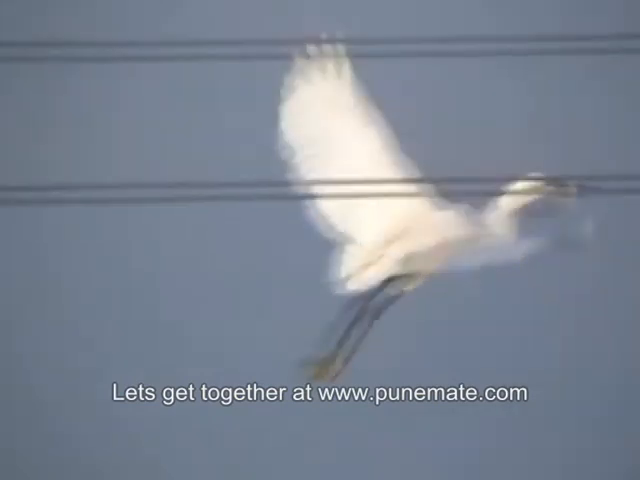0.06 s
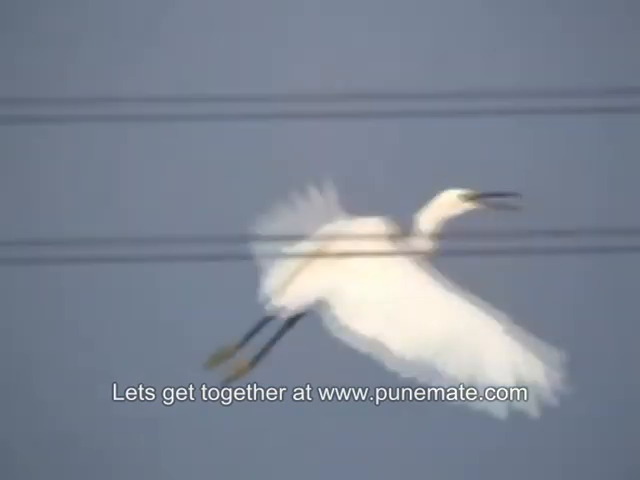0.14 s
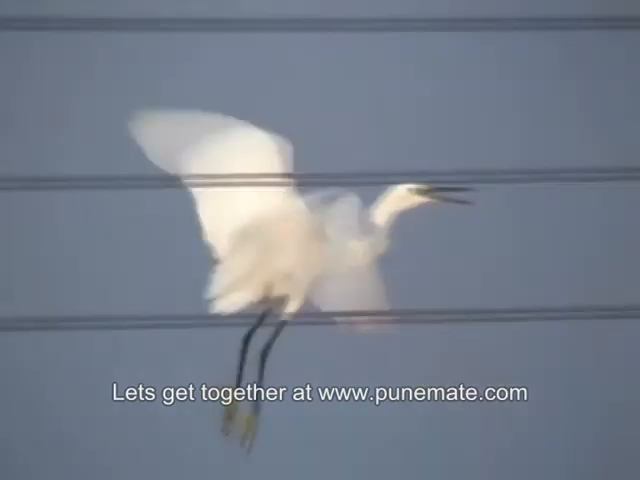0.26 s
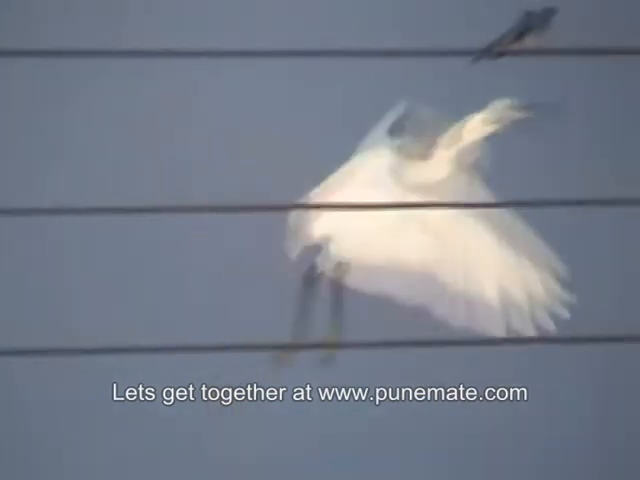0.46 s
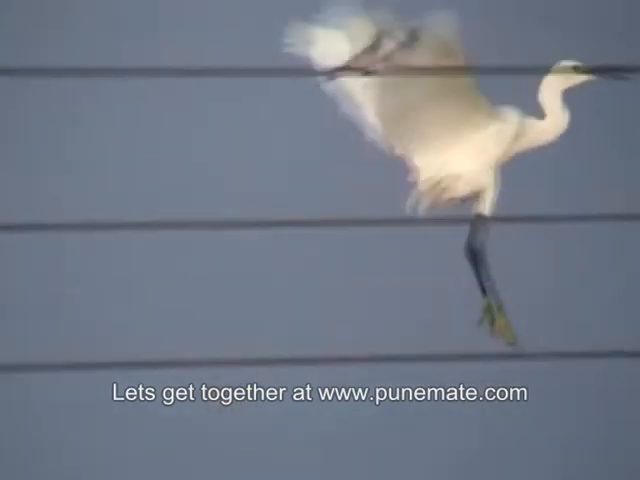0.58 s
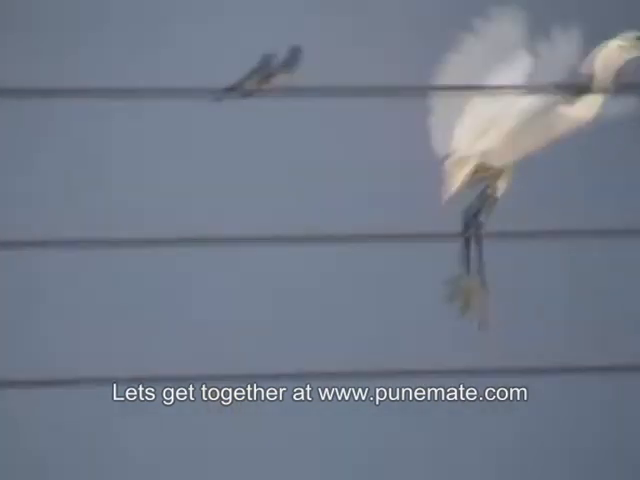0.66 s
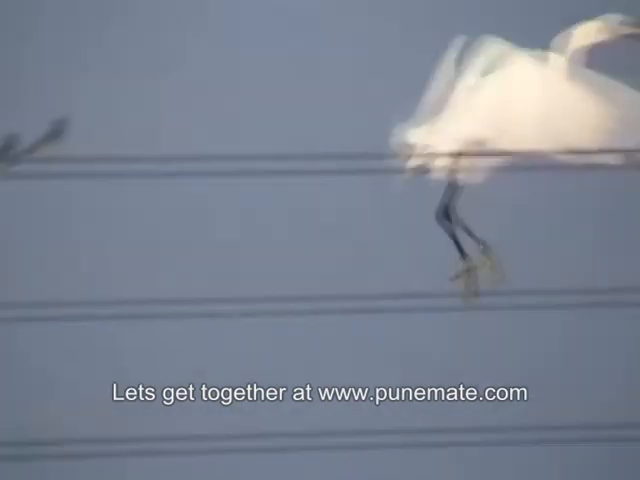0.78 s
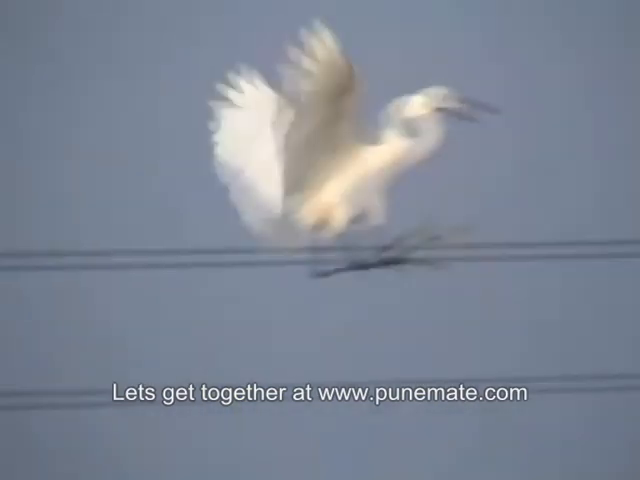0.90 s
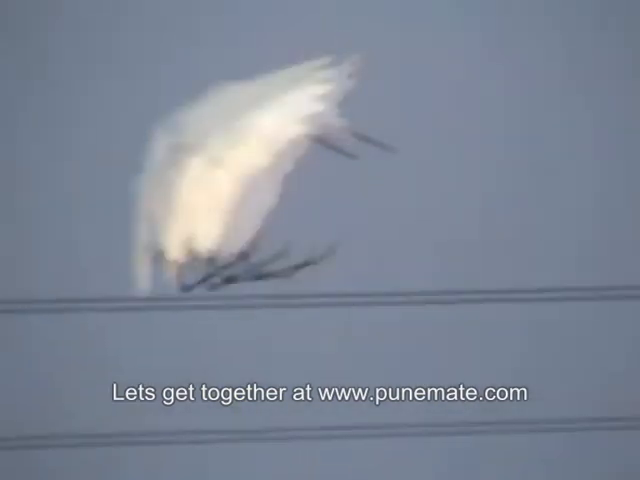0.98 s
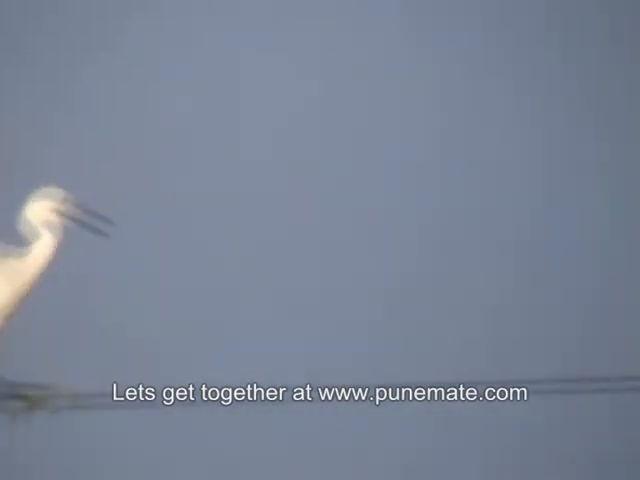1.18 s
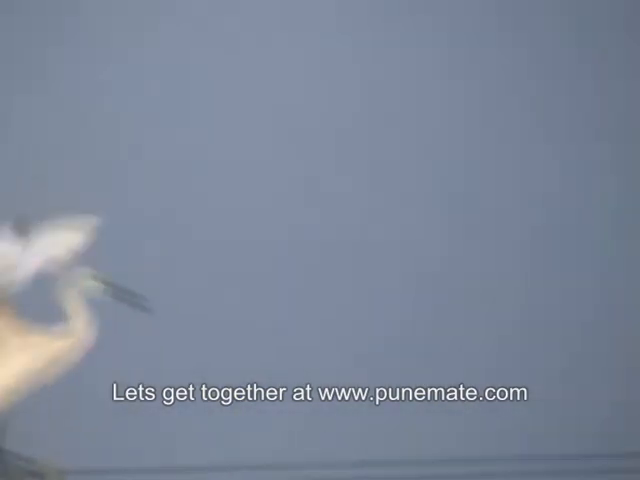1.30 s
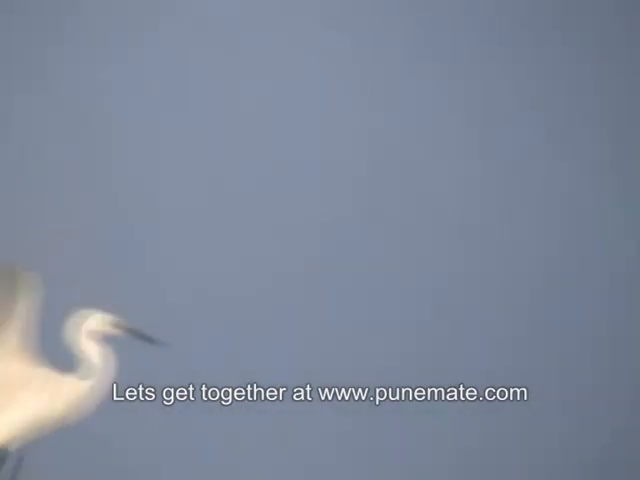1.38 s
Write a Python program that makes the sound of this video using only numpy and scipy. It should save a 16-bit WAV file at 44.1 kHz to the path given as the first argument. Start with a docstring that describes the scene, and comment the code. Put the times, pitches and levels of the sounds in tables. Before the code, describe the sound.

One loud, croaky heron-like squawk in open air, small birds twittering quietly before and after

```python
"""Outdoors before a stereo pair of microphones: shaped noise gives a low distant rumble and hiss throughout.
Small birds twitter nearby from the start, in rising chirps of gliding sines with late-joining neighbour lines.
At 0.23 s a large wading bird in flight gives one harsh squawk, 0.6 s long: uneven strong-weak pulses and breath
ring a long windpipe whose resonances slide as the bill opens and settles, and echoes scatter back.
After the squawk the twitter goes on, busier, over the same air."""
import sys
import numpy as np
from scipy import signal
from scipy.fft import rfft, irfft
from scipy.io import wavfile
from scipy.ndimage import uniform_filter1d

SR = 44100
rng = np.random.default_rng(int(sys.argv[2]) if len(sys.argv) > 2 else 0)


def transcribe(u):
    """Save the signal u as a 16-bit wav file named by the first command-line argument.

    u: samples, shape (n,) or (channels, n), limited to [-1, 1]; the rate is SR.
    q: integer samples, one column per channel.
    """
    v = np.clip(np.atleast_2d(u).T, -1, 1)
    q = np.round(v * 32767).astype(np.int16)
    wavfile.write(sys.argv[1], SR, q)


def volts(x):
    """Linear amplitude factor 10**(x/20) for a level x in dB, scalar or array-like."""
    e = np.asarray(x, float) / 20
    return 10 ** e


N = 63945  # length [samples]


def evened(x):
    """Scales to rms 1."""
    return x / np.sqrt(np.mean(x ** 2) + 1e-20)


def read(points, hz):
    """Reads a spectrum table on a log-frequency axis."""
    f, value = np.transpose(points)
    return np.interp(np.log(hz + 1), np.log(f + 1), value)


def add(mix, s, sound):
    """Mixes a sound in at s seconds."""
    part = mix[round(s * SR):][:len(sound)]
    part += sound[:len(part)]


def slow(n, span):
    """Smooth chance of rms 1, steady over about span samples."""
    span = max(int(span), 1)
    smooth = uniform_filter1d(rng.standard_normal(n), span)
    return evened(uniform_filter1d(smooth, span))


def resonate(x, hz, width):
    """Shifts the curve hz down to zero, smooths, and shifts back: a resonance of gain 1."""
    turn = np.exp(2j * np.pi * np.cumsum(hz * np.ones(len(x))) / SR)
    r = np.exp(-np.pi * width / SR)
    smooth = signal.lfilter([1 - r], [1, -r], x / turn + 1e-18)
    return 2 * (turn * smooth).real


def colour(x, gain):
    """Multiplies the spectrum by gain(hz)."""
    return irfft(rfft(x) * gain(np.fft.rfftfreq(N, 1 / SR)), N)


def echoes(x, t60, gap):
    """Scattered returns from ground and trees after gap seconds, other ones at each microphone."""
    t = np.arange(SR // 2) / SR
    signs = rng.choice([-1., 1.], (2, len(t)))
    hits = rng.random((2, len(t))) < 1500 / SR  # 1500 returns per second on average
    taps = signs * hits * volts(-60 * t / t60) * (t > gap)
    taps = taps / np.linalg.norm(taps, axis=1)[:, None]
    return signal.fftconvolve(x[None], taps, axes=1)[:, :N]


# Fuzzy steady tones, alike at both microphones, each resonated twice:
# (frequency [Hz], width of each resonance [Hz], level [dB])
STEADY_TONES = [(71.3, 34, -57), (186.5, 21, -56), (6130, 390, -75.5)]


def steady_tones():
    """Noise through the same narrow resonance twice gives each tone a fuzzy pitch."""
    total = 0
    for hz, width, db in STEADY_TONES:
        once = resonate(rng.standard_normal(N), hz, width)
        total = total + volts(db) * evened(resonate(once, hz, width))
    return total


# Spectrum of the distant rumble and hiss: (frequency [Hz], relative density [dB per Hz])
AIR_SPECTRUM = [(15, -23), (35, -20), (70, -1.5), (200, -5), (450, -11), (800, -9.5), (1300, -15.5),
                (2200, -16.5), (3000, -18), (4500, -22.5), (5500, -26), (6200, -22.5), (8000, -29),
                (11000, -32.5), (16000, -37.5)]
# Likeness of the air at the two microphones: (frequency [Hz], left-right correlation [0 to 1])
AIR_LIKENESS = [(30, 0.51), (100, 0.85), (180, 0.98), (250, 0.96), (600, 0.65), (1650, 0.2), (5000, 0.2),
                (15000, 0.63)]
# Rise and fall of the rumble and hiss: (time [s], level [dB])
AIR_LEVEL = [(0, -45.5), (.06, -49), (.15, -48), (.5, -47), (.9, -46), (1.2, -47), (1.45, -47)]


def air():
    """Distant rumble and hiss: shaped noise with drifting patches, plus the fuzzy steady tones."""
    frames, hz = N // 256 + 5, np.fft.rfftfreq(1024, 1 / SR)
    a, b, c, d, patches = rng.standard_normal((frames, 513, 5)).T
    patches = uniform_filter1d(patches, size=12, axis=0)
    patches = evened(uniform_filter1d(patches, size=12, axis=1))
    same = np.clip(read(AIR_LIKENESS, hz), -1, 1)[:, None]
    left = a + 1j * b
    right = same * left + np.sqrt(1 - same ** 2) * (c + 1j * d)
    z = np.array([left, right]) * volts(read(AIR_SPECTRUM, hz)[:, None] + 1.2 * patches)
    wash = evened(signal.istft(z, nperseg=1024, noverlap=768)[1][:, :N])
    level_db = np.interp(np.arange(N) / SR, *np.transpose(AIR_LEVEL))
    return wash * volts(level_db) + steady_tones()


# Lines beside a chirp's strong one: (place above or below it [count], level before the other shaping [dB])
SIDE_LINES = [(-1, -2), (1, -15), (2, -15), (3, -15), (4, -19), (6, -21)]
# What the beak passes of those lines: (frequency [Hz], gain [dB])
BEAK = [(1500, -30), (2300, -7), (2800, -2), (5300, 0), (6000, -6), (7000, -2), (14000, -8)]


def chirp(start, end, start_hz, top_hz, spacing_hz, bend, db, others_db):
    """A strong line glides along an S and swells toward its end; its neighbours join late, through the beak."""
    swell, droop = 1.8, .04  # lateness of the swell [exponent], fall of pitch at the very end [share]
    flutter_db, late_db = 3.5, -22  # rms flutter of each line [dB], softer start of the neighbours [dB]
    u = np.arange(round((end - start) * SR)) / ((end - start) * SR)
    v = u ** bend
    glide = v * v * (3 - 2 * v)
    hz = (start_hz + (top_hz - start_hz) * glide) * (1 - droop * u ** 12)
    phase = 2 * np.pi * np.cumsum(hz) / SR
    out = volts(flutter_db * slow(len(u), 77)) * np.sin(phase)
    for k, line_db in SIDE_LINES:
        ratio = 1 + k * spacing_hz / top_hz
        level_db = line_db + others_db + late_db * (1 - u) ** 3 + read(BEAK, hz * ratio)
        level_db = level_db + flutter_db * slow(len(u), 99)
        audible = ratio * top_hz < SR / 3  # lines too high are left out
        out += volts(level_db) * np.sin(phase * ratio + k) * audible
    envelope = np.sin(np.pi * u ** swell) ** .6
    return start, np.sqrt(2) * envelope * volts(db) * out


# Chirps of the small birds nearby: (start [s], end [s], start pitch [Hz], goal pitch before the droop [Hz],
# line spacing at the goal [Hz], bend of the glide [exponent], strong line before swell and flutter [dB],
# other lines' offset [dB])
CHIRPS = [(.006, 0.051, 3730, 4010, 1030, 1.54, -50.5, -1), (0.038, 0.061, 2470, 3490, 695, 1.1, -47, 4.5),
          (0.043, .076, 3430, 4130, 845, .8, -55, 0), (0.195, 0.225, 2090, 2605, 1280, 1.1, -53.5, -4),
          (.229, 0.245, 3200, 4000, 1270, 1.2, -52, -16), (0.881, 0.927, 2950, 4520, 868, 1, -53.5, 2),
          (.948, 1.013, 3335, 4940, 1207, 1.38, -44.5, 2),
          (1.048, 1.078, 2650, 3965, 984, 1.23, -50.5, 3.5), (1.099, 1.148, 7120, 5280, 3000, 1, -57, -24),
          (1.116, 1.161, 2795, 4750, 1515, .9, -43.5, 2), (1.161, 1.193, 2650, 3245, 1080, 1.12, -47.5, 3),
          (1.183, 1.217, 3000, 4004, 1010, 0.82, -46.5, 1), (1.274, 1.336, 3710, 4635, 1120, 1.8, -50, 4),
          (1.328, 1.367, 2900, 4560, 1330, 0.85, -47.5, 1.5), (1.381, 1.405, 3560, 4140, 1055, .9, -58, 7),
          (1.384, 1.406, 4600, 5900, 1500, 0.88, -54, -12)]


def twitter():
    """Small birds nearby, a little to the right: softer and later at the left microphone, with short echoes."""
    pan_db, lag_s, echo_db = -3.5, .000008, -10
    mono = np.zeros(N)
    for row in CHIRPS:
        add(mono, *chirp(*row))
    left = colour(mono, lambda hz: volts(pan_db) * np.exp(-2j * np.pi * hz * lag_s))
    return np.array([left, mono]) + volts(echo_db) * echoes(mono, 0.15, .003)


# Mean rate of the squawk's pulses before jitter, strong and weak taking turns: (time [s], rate [pulses/s])
PULSE_RATE = [(.23, 276), (.35, 288), (.48, 270), (.56, 250), (.85, 256)]


def pulses_and_puffs(t, onset):
    """Strong and weak pulses take turns at a jittering rate; each lets through a fading puff of breath."""
    jitter, weak_db, uneven_db = .165, -4, 3  # rms of log rate, weak against strong [dB], chance spread [+-dB]
    rate = np.interp(t, *np.transpose(PULSE_RATE)) * np.exp(jitter * slow(N, 60)) * (t >= onset)
    turns = np.cumsum(rate) / SR + 1 - 1e-3  # the first pulse falls at the onset
    whole = turns.astype(int)
    size = volts(uneven_db * rng.uniform(-1, 1, N)[whole] + weak_db * (whole % 2))
    pulses = evened(-size * (np.diff(whole, prepend=0) > 0) * (t > 0))
    gate = .7 + np.exp(-(turns % 1) / .3)
    puffs = evened(np.sqrt(size) * gate * rng.standard_normal(N))
    pulses = signal.lfilter(*signal.butter(2, 6500, fs=SR), pulses)  # slightly rounds each pulse
    return pulses, puffs


# Breath against pulses in the squawk: (frequency [Hz], share of breath [0 to 1])
BREATH = [(500, .3), (3000, .33), (5000, .6), (8000, .85), (16000, .9)]
# Windpipe resonances before their wander: (opening [Hz], wide [Hz], settled [Hz], width [Hz],
# relative gain opening [dB], wide [dB], settled [dB])
PIPE = [(540, 600, 500, 48, -18.5, -21.5, -27.5), (1090, 1216, 1120, 107, -7, -6, -10.5),
        (1410, 1450, 1488, 67.6, -0.5, -10.5, -2), (1830, 1863, 1601, 67.7, -3, 0, 1.5),
        (2115, 1510, 2066, 75, -12.5, -10.5, -15), (2590, 2400, 2165, 60, -6.5, 0.5, -10),
        (3000, 2970, 2879, 86, -26, -2.5, -12.5), (3300, 3520, 3300, 230, -22.5, -16, -20.5),
        (3760, 3750, 3980, 67, -16, -42, -29.5), (4360, 4390, 4200, 105, -14, -19, -30),
        (4760, 4780, 4800, 140, -41, -21, -29.5), (5290, 3900, 5250, 133, -44, -22, -28),
        (6350, 6200, 6200, 118, -27, -25, -29), (6750, 6650, 6680, 105, -36, -20, -30),
        (9240, 13000, 9370, 184, -32, -38.5, -37), (10500, 10100, 10700, 350, -48, -42, -56),
        (13300, 20000, 16000, 330, -42, -31, -44), (14100, 13000, 10000, 300, -46, -44, -39)]


def windpipe(pulses, puffs, pose):
    """Resonances of the long windpipe slide with the bill's posture and wander slightly; level kept even."""
    wander, wander_db = .004, .7  # rms of frequency [share] and of gain [dB]
    pipe = np.zeros(N)
    for k, (opening, wide, settled, width, *dbs) in enumerate(PIPE):
        hz = np.interp(pose, [0, 1, 2], [opening, wide, settled]) * (1 + wander * slow(N, 600))
        drive = pulses + read(BREATH, wide) * (puffs - pulses)
        gain_db = np.interp(pose, [0, 1, 2], dbs) + wander_db * slow(N, 1000)
        pipe += (-1) ** k * volts(gain_db) * resonate(drive, hz, width)
    return pipe / np.sqrt(uniform_filter1d(pipe ** 2, size=1200) + 1e-12)


# Spectrum of the rasp beside the resonances: (frequency [Hz], relative gain [dB])
RASP = [(500, -30), (800, -19.5), (1100, -6.5), (1600, 4), (2400, 5.5), (3100, -9.5), (4000, -15),
        (5500, -12), (7000, -36), (8200, -35), (10000, -68), (12000, -37), (14000, -27), (16000, -31)]


def rasp(pulses, puffs, pose):
    """Pulses and breath by a fixed spectrum, not the sliding one; strongest with the bill wide."""
    wide_db, settled_db, opening_db = -4.5, -12, -2.8  # level when wide, changes when settled and opening
    pulse_part = colour(pulses, lambda hz: volts(read(RASP, hz)) * (1 - read(BREATH, hz)))
    breath_part = colour(puffs, lambda hz: volts(read(RASP, hz)) * read(BREATH, hz))
    level_db = wide_db + settled_db * np.maximum(pose - 1, 0) + opening_db * np.maximum(1 - pose, 0)
    return evened(pulse_part + breath_part) * volts(level_db)


# Lowest windpipe tone before its waver, nearly clean: (time [s], frequency [Hz], level [dB])
LOW_TONE = [(0.25, 535.1, -52), (0.29, 584, -46), (0.346, 595.2, -42.5), (0.442, 555.8, -51),
            (0.502, 589, -41), (0.554, 604, -41), (0.568, 573, -50), (0.67, 567, -45.5),
            (0.748, 639.7, -57), (0.776, 564, -50.5), (0.814, 551, -46.5), (0.84, 594, -68)]


def low_tone(t):
    """The lowest windpipe tone: one sine whose pitch and level waver."""
    s, low_hz, low_db = np.transpose(LOW_TONE)
    hz = np.interp(t, s, low_hz) * (1 + .01 * slow(N, 140))
    sine = np.sin(2 * np.pi * np.cumsum(hz) / SR)
    return np.sqrt(2) * sine * volts(np.interp(t, s, low_db, -200, -200) + 2.24 * slow(N, 160))


# Effort and bill of the wading bird: (time [s], windpipe level [dB],
# posture [0 opening, 1 wide, 2 settled, held at 2 above that])
SQUAWK = [(0.2293, -70, 0), (0.229, -37.5, 0.1), (0.257, -28, 0.03), (.29, -29, 0.65), (0.358, -26, 0.94),
          (0.459, -25, 1.51), (.55, -24.5, 1.5), (.64, -23.5, 1.78), (.72, -26, 1.89), (0.758, -24.5, 1.97),
          (0.837, -25.5, 2.31), (.846, -39, 2.3), (0.851, -71, 2.7)]
# Phase of the direct squawk between microphones: (frequency [Hz], left lead [rad])
SQUAWK_PHASE = [(0, 0.054), (1550, -0.14), (2500, -0.47), (3360, -0.6), (4050, 0.18), (6460, -0.04),
                (6800, -0.2), (8100, 0.0), (15200, -0.0)]
# Balance of the direct squawk between microphones: (frequency [Hz], left minus right [dB])
SQUAWK_PAN = [(60, -2), (110, 0.0), (200, 0.0), (380, -1), (700, 1), (1290, 0.5), (2380, 0.0), (4400, -3),
              (8120, 0.5), (15000, -3.5)]


def squawk():
    """The wading bird's voice straight to both microphones, with quick ground returns and longer echoes."""
    echo_db, echo_t60_s, echo_gap_s = -17, 0.28, .004
    near_db, near_t60_s, near_gap_s = -8.5, 0.028, 0.00073  # first returns from the ground
    t = np.arange(N) / SR
    s, effort_db, posture = np.transpose(SQUAWK)
    pose = np.clip(np.interp(t, s, posture), 0, 2)
    pulses, puffs = pulses_and_puffs(t, s[1])
    voice = windpipe(pulses, puffs, pose) + rasp(pulses, puffs, pose)
    voice = voice * volts(np.interp(t, s, effort_db, -200, -200)) + low_tone(t)

    def half(hz):
        """Half the left-right difference, given to the left and taken from the right."""
        return volts(read(SQUAWK_PAN, hz) / 2) * np.exp(.5j * read(SQUAWK_PHASE, hz))

    direct = np.array([colour(voice, half), colour(voice, lambda hz: 1 / half(hz))])
    # the ground returns hold mostly 2300 to 9000 Hz
    bright = colour(voice, lambda hz: 1 / (1 + (2300 / (hz + 1)) ** 4) / (1 + (hz / 9000) ** 4))
    far = volts(echo_db) * echoes(voice, echo_t60_s, echo_gap_s)
    near = volts(near_db) * echoes(bright, near_t60_s, near_gap_s)
    return direct + far + near


def scene():
    """Squawk, twitter and air together at the two microphones."""
    return squawk() + twitter() + air()


def band_limit(x):
    """A steep low-pass at the top of the band."""
    return signal.sosfilt(signal.butter(12, 15640, fs=SR, output="sos"), x)


def record(dry):
    """Takes the finished stereo mix of the scene to its final sound."""
    return band_limit(dry)


dry = scene()
out = record(dry)
transcribe(out)
```